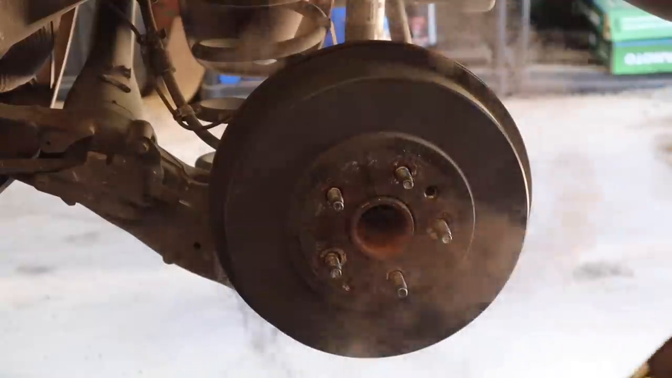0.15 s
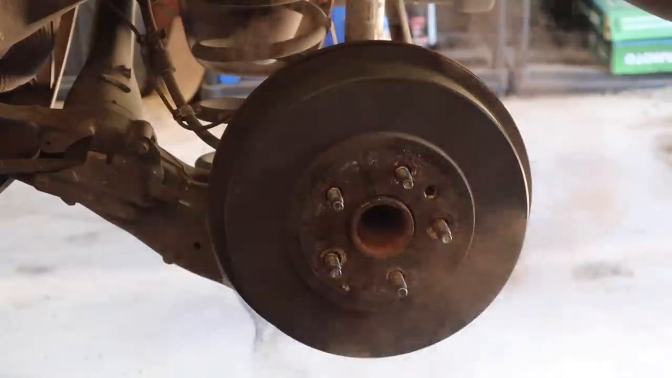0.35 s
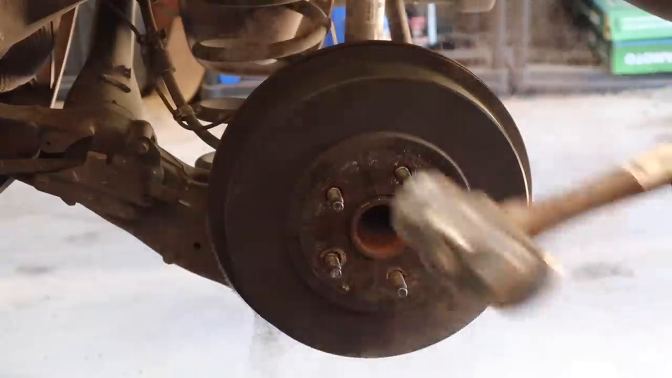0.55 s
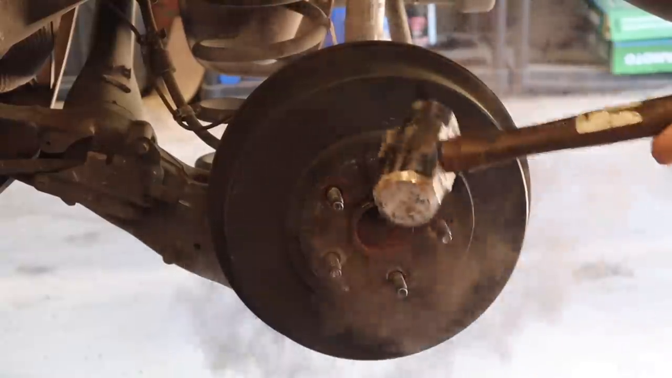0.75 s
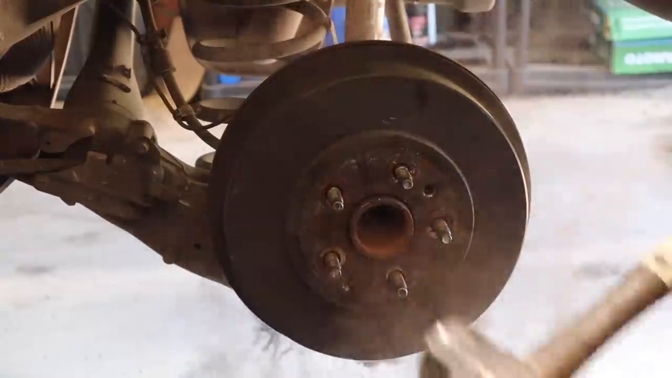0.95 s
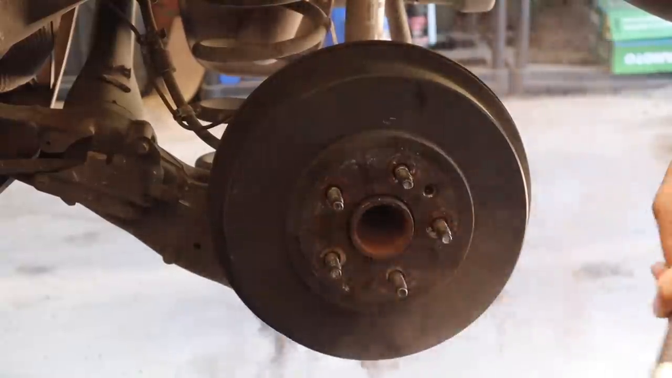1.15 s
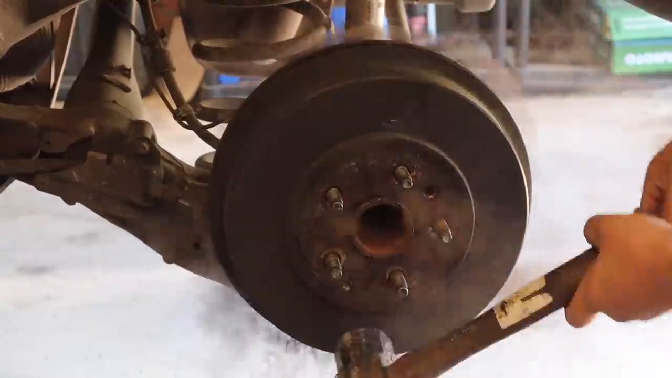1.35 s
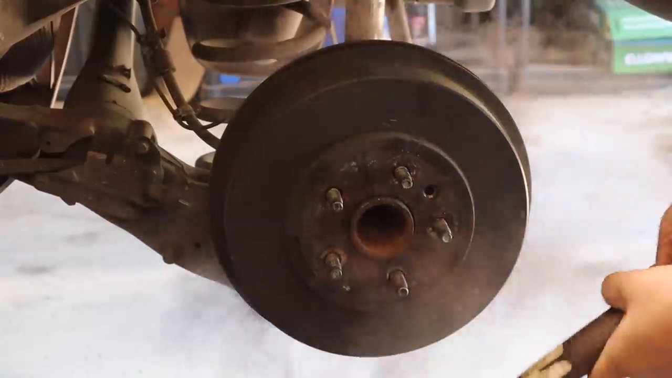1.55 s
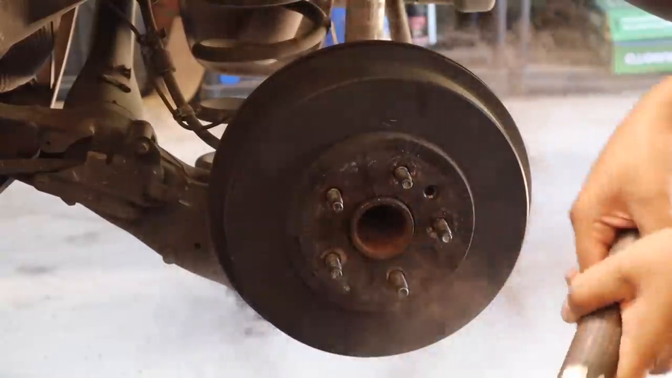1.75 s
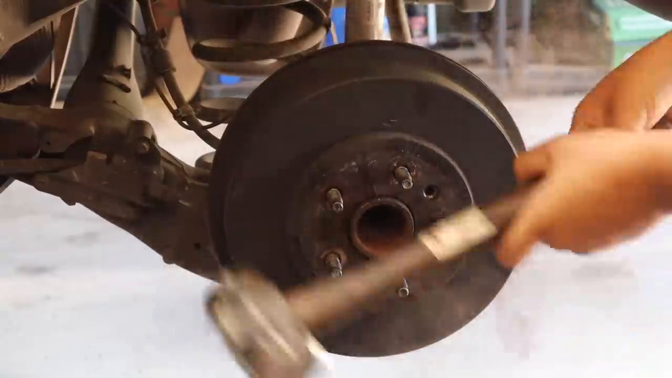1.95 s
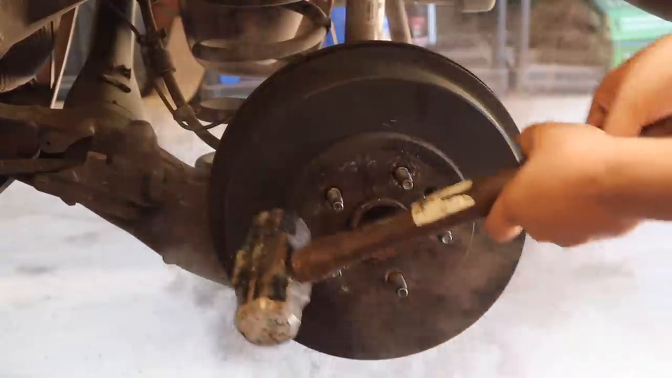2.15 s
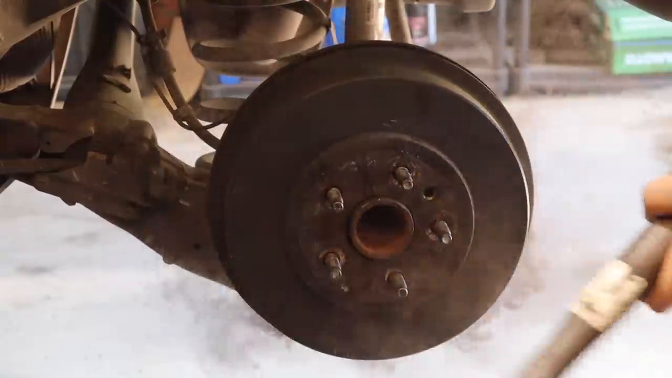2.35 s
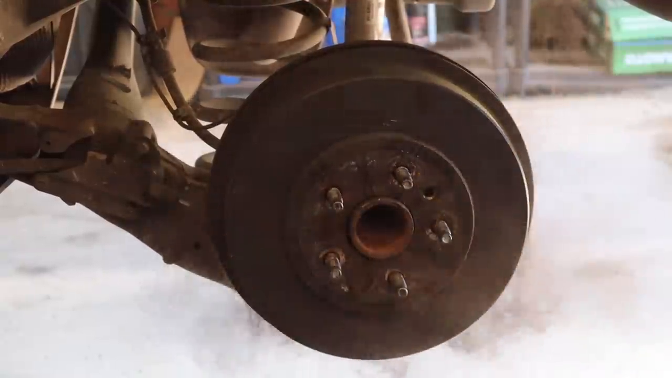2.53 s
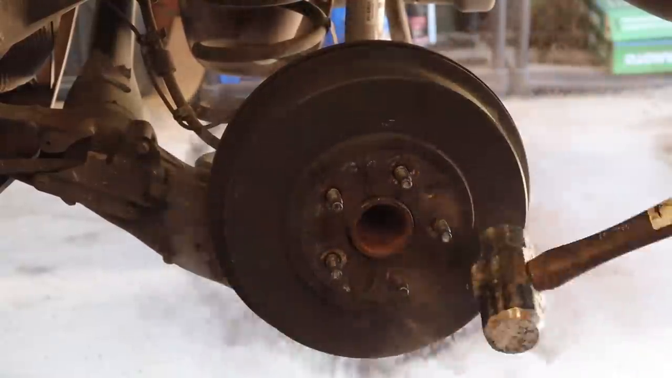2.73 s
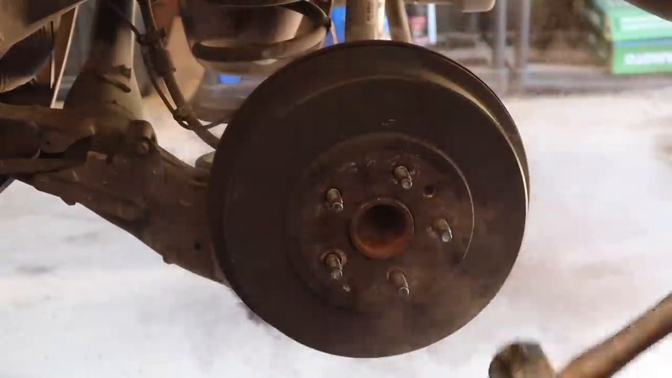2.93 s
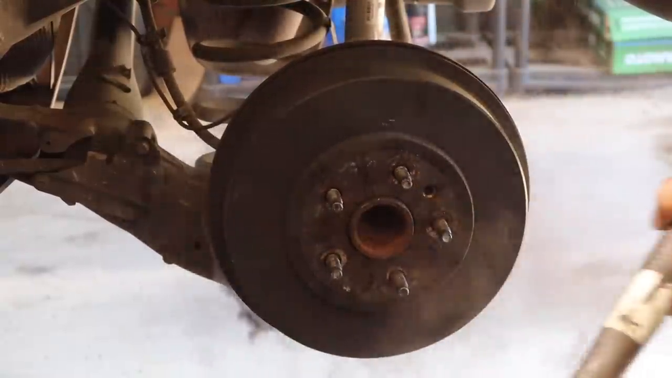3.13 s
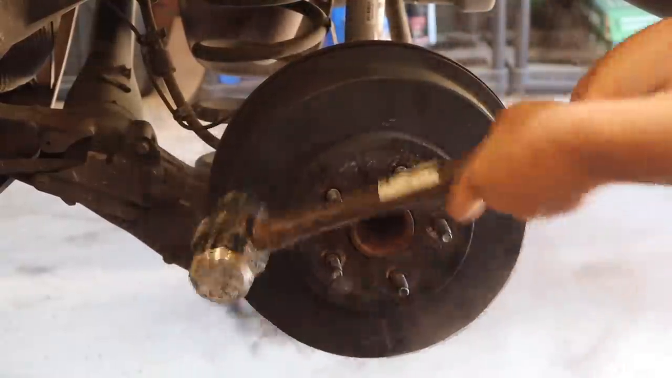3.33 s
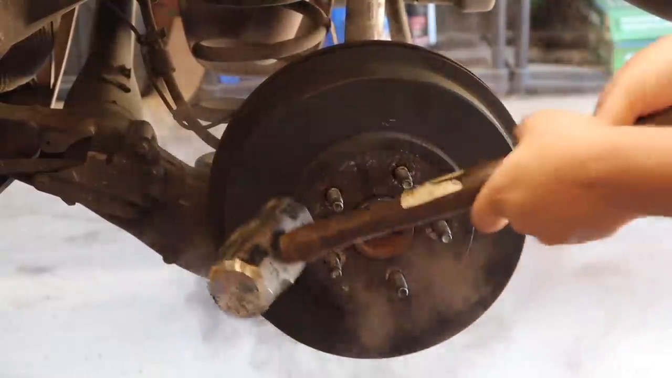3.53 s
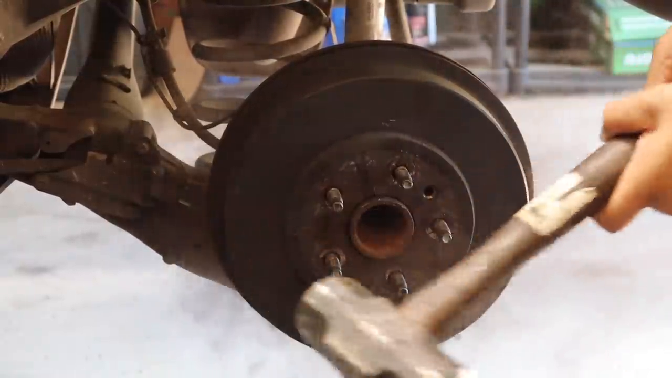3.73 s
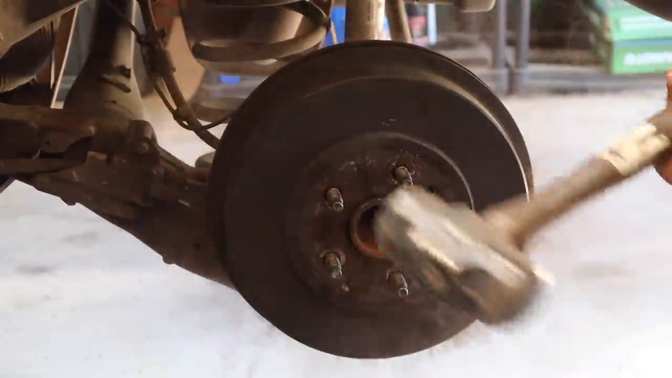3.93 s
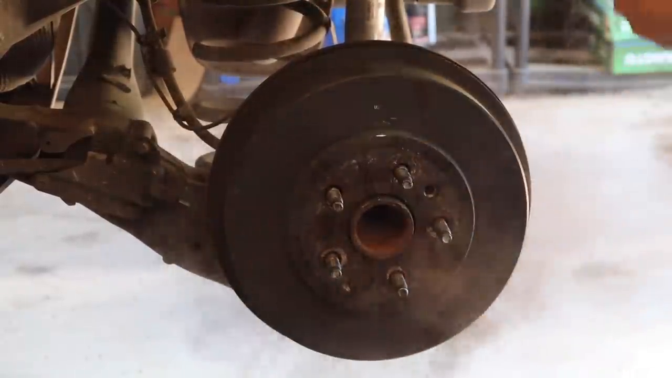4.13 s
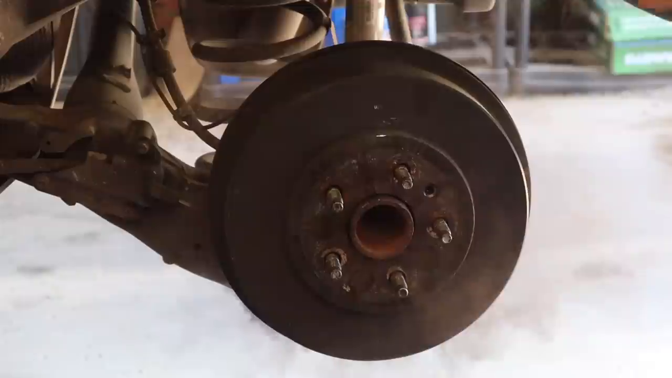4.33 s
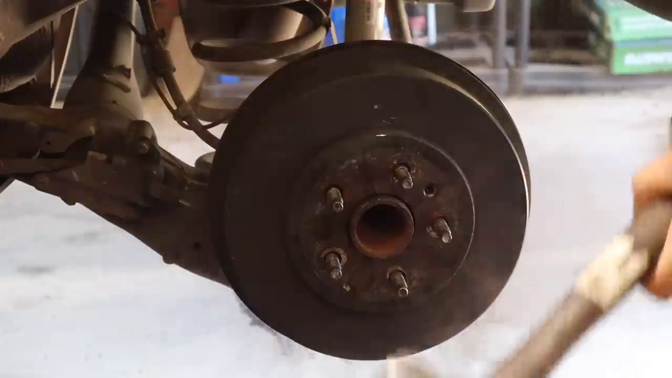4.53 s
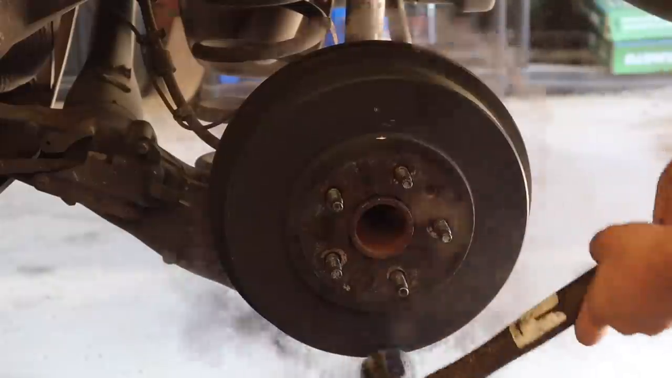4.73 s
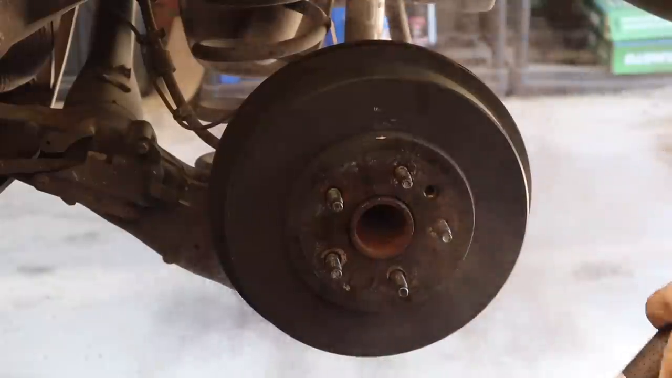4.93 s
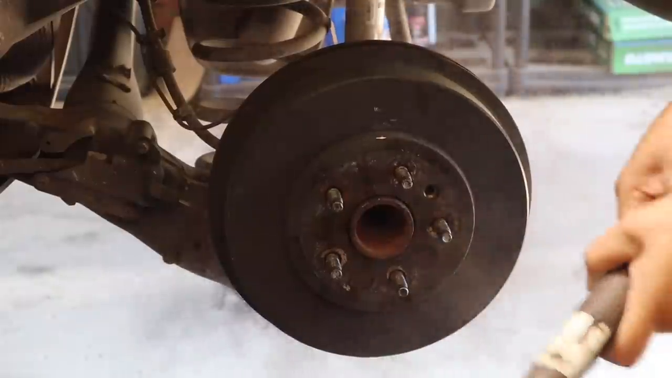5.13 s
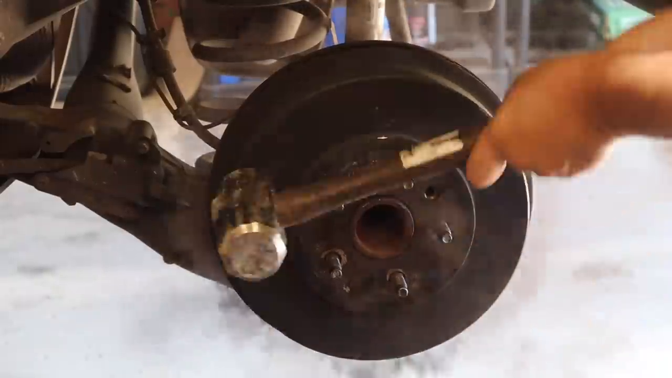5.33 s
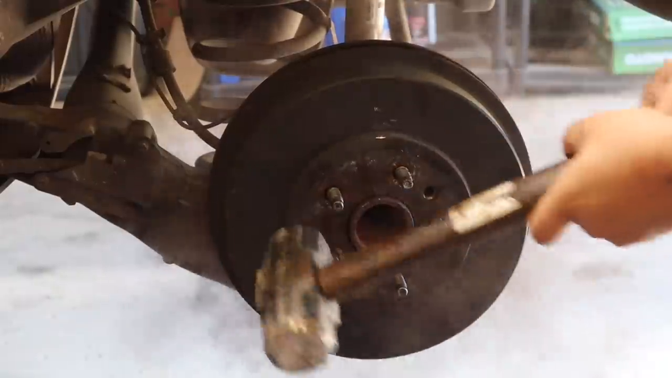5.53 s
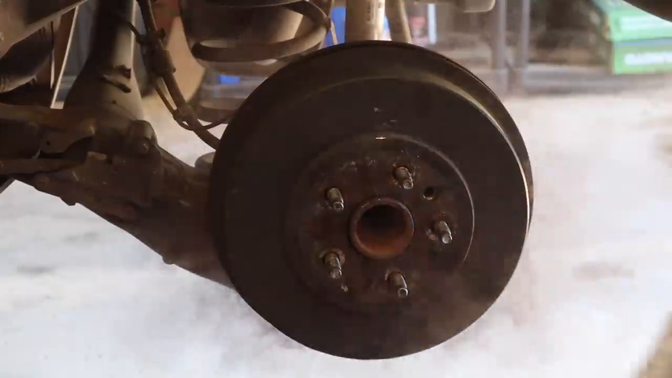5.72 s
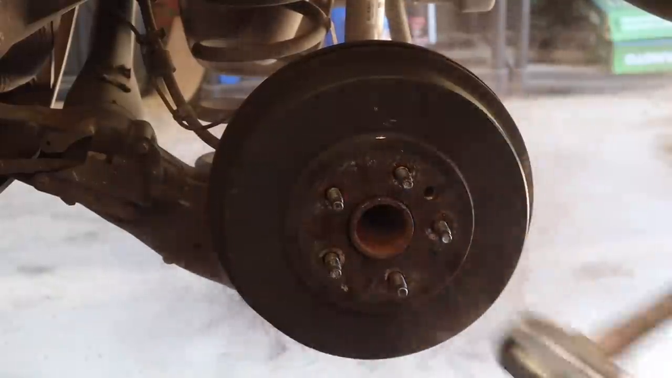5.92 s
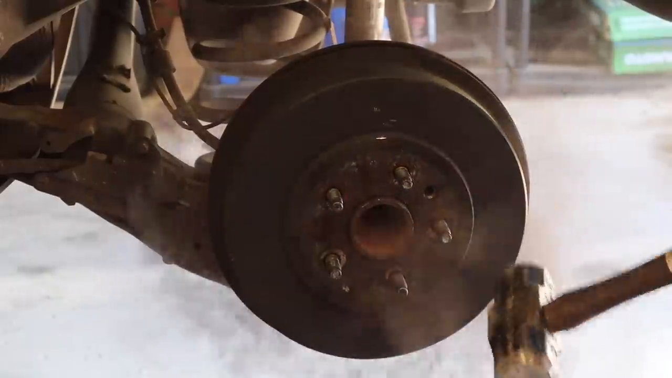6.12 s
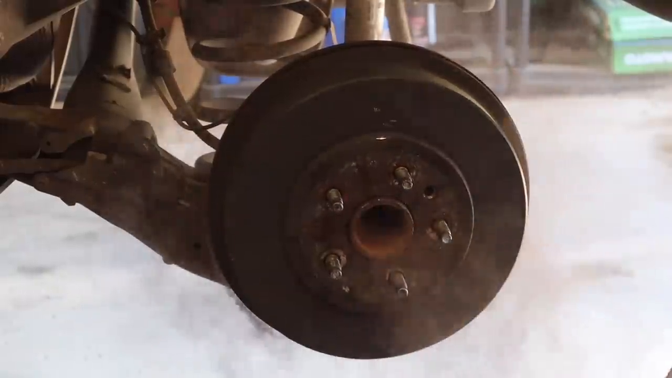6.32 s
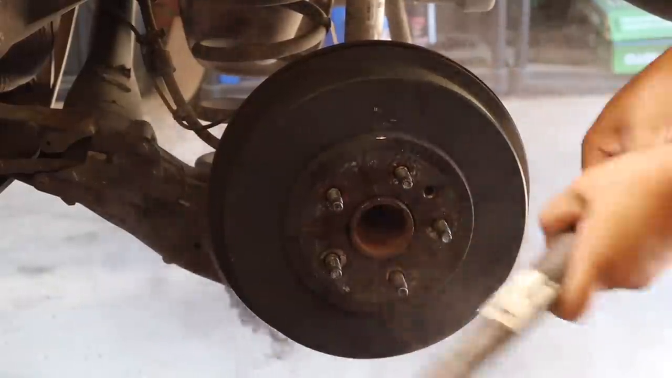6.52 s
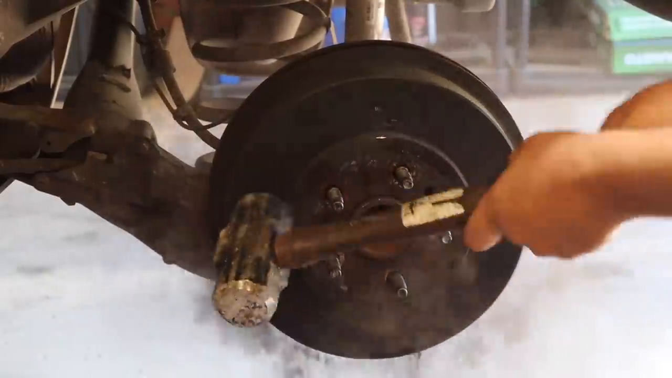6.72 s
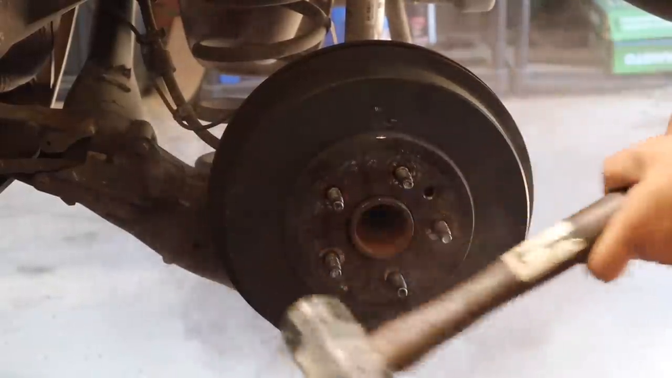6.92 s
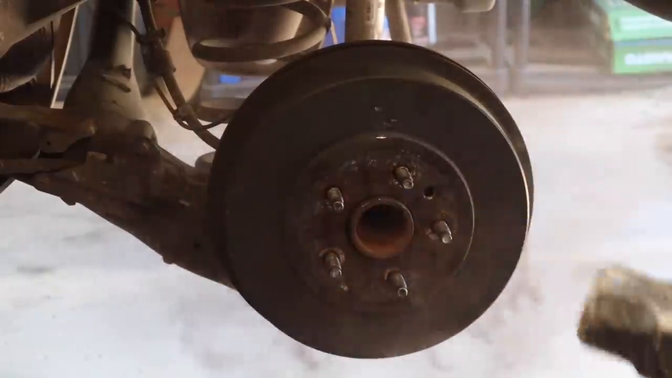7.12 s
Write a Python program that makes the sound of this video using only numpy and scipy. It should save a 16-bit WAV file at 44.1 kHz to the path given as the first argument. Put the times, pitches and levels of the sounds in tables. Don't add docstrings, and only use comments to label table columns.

```python
import sys
import numpy as np
from scipy import signal
from scipy.fft import rfft, irfft, next_fast_len
from scipy.io import wavfile
from scipy.ndimage import uniform_filter1d

SR = 44100
rng = np.random.default_rng(int(sys.argv[2]) if len(sys.argv) > 2 else 0)


def to_wav(sig):
    pcm = np.clip(np.atleast_2d(sig), -1, 1) * 32767
    pcm = np.round(pcm).astype(np.int16)
    wavfile.write(sys.argv[1], SR, pcm.T)


def gain_from_db(level_db):
    decades = np.asarray(level_db, float) / 20
    return 10 ** decades


N = 320607
TAIL = 65536
EARLY_S = 0.0011


def hammering():
    # t/s, force/dB, reach (0 hub - 1 rim), angle round the drum/degrees,
    # weight (0 skidding - 1 dead into the axle)
    blows = [(-0.006, -4, 0.26, 238.4, 0.94), (.7159, 0, 0.0088, 346, .7), (1.394, 2.3, .48, 241.4, .62),
             (2.092, 4, 0.44, 12.7, .33), (2.769, 0.7, .55, 295.9, .53), (3.4373, -1.1, .8, 291.4, .06),
             (4.1032, -6, 0.0087, 85.5, 0.012), (4.7726, 4.5, 0.087, 24.6, 0.65),
             (5.4125, 1.46, 0.91, 68, .35), (6.0713, 0.6, .25, 293.2, .21), (6.7087, 4, 0.37, 165.4, .01)]
    # level at the hub/dB, gain at the rim/dB,
    # swing from crest to mean/dB, angle of a crest/degrees
    rings = [(9, -11.5, 5.5, 94.4), (0.3, 0.5, 8.5, 82.3), (-7.5, 11.5, 8, 2.4), (-.3, -9, 12.5, 3.9),
             (-0.4, 4.5, -0.4, 22.5), (-0.94, 6.9, 5, 1.4)]
    # level at the hub/dB, gain at the rim/dB, gain by weight/dB,
    # gain by force/(dB per dB)
    parts = [
        (1.1, -5.5, -0.7, 0.3),
        (-8.5, -5.5, 9.5, 0),
        (3, -1.1, -1.9, 0.35),
        (-2, 6.5, -2.5, 0.78),
        (0.5, 0, -3.5, 0.98),
    ]
    out = np.zeros(N + 2 * TAIL)
    for s, force_db, reach, angle, weight in blows:
        colour = [hub + rim * reach + dead * weight + push * force_db for hub, rim, dead, push in parts]
        families = []
        for waves, (hub, rim, swing, crest) in enumerate(rings, 2):
            round_shell = swing * np.cos(np.radians(waves * (angle - crest)))
            families.append(force_db + hub + rim * reach + round_shell)
        i = TAIL + int((s - EARLY_S) * SR)
        out[i:i + TAIL] += blow(*colour, families)
    return out[TAIL:TAIL + N]


def blow(boom_db, thud_db, body_db, clang_db, bright_db, family_db):
    # f/Hz, level/dB per Hz
    crack_colour = [(40, -21), (100, -2), (200, 8.5), (500, 1), (1000, -2), (1700, -8), (2500, -8.5),
                    (4000, -6), (5500, -14.5), (8000, -16), (12000, -22.5), (17000, -35.5)]
    drum_hz = [2090, 2135, 2290, 2880, 2970, 3040, 3742, 3850, 3500, 4300, 4210, 4345, 5150, 5440, 5566,
               6170, 6060, 6130, 6865, 8260, 9360, 10300, 11250, 12400, 2200, 3350]
    # ring family (the last follows brightness), level/dB, t60/s
    drum = [(0, -4.5, 0.08), (0, -6, 0.035), (0, -13.5, 0.066), (1, -1.5, 0.061), (1, -7.5, 0.061),
            (4, -7.5, 0.074), (2, -5, 0.1), (4, -5, 0.045), (2, -22, 0.046), (3, -3, 0.075),
            (3, -7.5, 0.045), (3, -11, 0.064), (4, -7.5, 0.039), (4, -15, 0.1), (4, -14, 0.11),
            (5, -11, 0.1), (5, -0.5, 0.015), (5, -7, 0.056), (4, -20.5, 0.12), (6, -13.5, 0.079),
            (4, -25, .07), (3, -24, .04), (5, -26.5, .06), (4, -24, 0.041), (0, 0, 0.013), (1, -14, 0.035)]
    # f/Hz, level/dB, t60/s
    plate = [(1065, -49, 0.067), (1445, -2.5, 0.056), (1555, 0, 0.052), (1630, -2, 0.047), (1694, 2, 0.033),
             (1839, 6.5, 0.013)]
    # f/Hz, level/dB, t60/s
    axle = [(154, -12, 0.12), (184, -8, 0.05), (291, -13, 0.17), (344.2, -9.5, 0.15), (399, -14, .12),
            (475.3, -16, 0.3), (564, -19, 0.087), (659.5, -11, 0.068)]
    crack_db, ring_db, early_db = 33, -8.5, -42
    boom_hz, boom_level_db, boom_t60_s = 70, -13.5, 0.48
    bite_s = 0.0005

    place = [(60, boom_db), (170, thud_db), (600, body_db), (1600, clang_db),
             (3500, np.mean(family_db)), (10000, bright_db)]
    crack = gain_from_db(crack_db + shape(crack_colour) + shape(place)) ** 2

    answers_db = [*family_db, bright_db]
    table = [(hz, db + answers_db[k], t60) for hz, (k, db, t60) in zip(drum_hz, drum)]
    table += [(hz, db + clang_db, t60) for hz, db, t60 in plate]
    table += [(hz, db + body_db, t60) for hz, db, t60 in axle]
    chance = rng.standard_normal((len(table), 2))
    table = [(hz * (1 + .0015 * c[0]), db + 1.5 * c[1], t60) for (hz, db, t60), c in zip(table, chance)]
    impact = causal(crack + gain_from_db(ring_db) ** 2 * modes(table, TAIL))
    heard = irfft(impact * aftermath())

    t = np.arange(TAIL) / SR
    late = t - EARLY_S
    through_steel = gain_from_db(early_db) * np.gradient(heard) * (late < 0)
    through_air = np.roll(heard, int(EARLY_S * SR)) * np.clip(late / bite_s, 0, 1)
    boom_envelope = gain_from_db(boom_level_db + boom_db) * fade(boom_t60_s) * (1 - fade(0.035))
    boom = boom_envelope * np.sin(2 * np.pi * boom_hz * t)
    return (through_steel + through_air + boom) * np.clip(np.linspace(4, -1, TAIL), 0, 1)


def aftermath():
    # f/Hz, t60/s, build-up/s
    room = [(61, 0.93, 0.011), (222, 0.52, 0.06), (556, 0.69, 0.0029), (1200, 0.78, 0.0079),
            (3000, 0.71, 0.0017), (5800, 0.63, 0.0018), (8000, 0.48, 0.0021), (9700, 0.42, 0.0027),
            (13000, 0.4, 0.0024), (16000, 0.35, 0.0014)]
    room_db = 3
    chatter_db, chatter_t60_s = 15.5, 0.062
    snap_db, snap_t60_s = 4.5, 0.038
    noise, echoes = rfft(rng.standard_normal(TAIL)), 0
    for k, (_, t60, rise) in enumerate(room):
        share = shape([(row[0], float(j == k)) for j, row in enumerate(room)])
        build_up = 1 - np.exp(-np.arange(TAIL) / SR / rise)
        echoes = echoes + irfft(noise * share) * fade(t60) * build_up
    quick = gain_from_db(chatter_db) * unit(rng.standard_normal(TAIL) * fade(chatter_t60_s))
    quick += gain_from_db(snap_db) * unit(rng.standard_normal(TAIL) * fade(snap_t60_s))
    quick[0] += 1
    power = abs(rfft(quick)) ** 2
    even = causal(uniform_filter1d(power, size=1500) / uniform_filter1d(power, size=40))
    return gain_from_db(room_db) * rfft(unit(echoes)) + rfft(quick) * even


def modes(table, size):
    hz = np.arange(size // 2 + 1) * SR / size
    power = 0
    for mid, db, t60 in table:
        half_width = np.log(1000) / (2 * np.pi * t60)
        power = power + (gain_from_db(db) * SR / (4 * np.pi)) ** 2 / ((hz - mid) ** 2 + half_width ** 2)
    return power


def causal(power):
    fold = irfft(np.log(power) / 2)
    fold[1:TAIL // 2] *= 2
    fold[TAIL // 2 + 1:] = 0
    return np.exp(rfft(fold))


def shape(points):
    hz, value = np.transpose(points)
    return np.interp(np.log(np.arange(TAIL // 2 + 1) * SR / TAIL + 1), np.log(hz), value)


def fade(t60):
    return np.exp(-np.log(1000) * np.arange(TAIL) / SR / t60)


def unit(x):
    return x / np.sqrt(np.sum(x ** 2))


def puffs():
    # t/s, level/dB, f/Hz
    pushes = [
        (2.7445, -25, 269),
        (2.7525, -69, 250),
        (2.7615, -16.5, 78),
    ]
    t = np.arange(N) / SR
    out = 0
    for k, (s, db, hz) in enumerate(pushes):
        bell = np.exp(-(2.2 * hz * (t - s)) ** 2)
        out = out + gain_from_db(db) * (-1) ** k * np.cos(2 * np.pi * hz * (t - s)) * bell
    return out


def springs():
    # f/Hz, level/dB
    coils = [(4861, -74.5), (5270, -77), (5416, -70.5), (6288, -80.5), (6842, -75), (7267, -78.5),
             (7424, -83.5), (7542, -76.5), (7983, -80), (8974, -92), (9157, -87.5), (9846, -86.5),
             (10546, -88.5), (11057, -88), (11273, -72.5), (12382, -79), (13415, -83), (13808, -87),
             (14497, -78), (15698, -89.5)]
    spring_db, spring_t60_s, rustle_db = -28.5, 0.14, -70
    size = next_fast_len(N + SR, True) // 2 * 2
    knocks = trembling() * gain_from_db(1.5 * walk(25)) * rng.standard_normal(N)
    weak = [(5000 + 10000 * a, -85 + 8 * b) for a, b in rng.random(size=(30, 2))]
    table = [(hz, db + spring_db, spring_t60_s) for hz, db in list(coils) + weak]
    jingle = irfft(rfft(knocks, size) * np.sqrt(modes(table, size)))[:N]
    band = signal.butter(2, [5000, 14000], "band", fs=SR, output="sos")
    return jingle + gain_from_db(rustle_db) * signal.sosfilt(band, knocks)


def trembling():
    # start t/s, level/dB, length/s
    shakes = [
        (.001, 7, .3),
        (2.553, -13.5, .22),
        (2.819, 6, .63),
        (4.12, 11.5, .5),
        (4.595, 11, .2),
        (5.65, 2.5, .25),
        (5.891, 3, .2),
        (6.763, 7.5, .38),
    ]
    attack_s, sag_db_per_s, release_db_per_s, rest_db = 0.03, 15, 201.5, -23
    out = gain_from_db(rest_db)
    for s, db, length in shakes:
        late = np.clip(np.arange(N) / SR - s, 0, None)
        lost_db = sag_db_per_s * late + release_db_per_s * np.clip(late - length, 0, None)
        out = out + gain_from_db(db - lost_db) * (1 - np.exp(-late / attack_s))
    return out


def flakes():
    # t/s, level/dB
    landings = [
        (0.621, -60),
        (2.575, -62),
        (2.656, -60),
        (2.68, -62.5),
        (2.748, -53),
        (3.865, -64),
    ]
    out = np.zeros(N)
    for s, db in landings:
        tick = np.diff(rng.standard_normal(129)) * fade(.004)[:128]
        out[int(s * SR):int(s * SR) + len(tick)] += gain_from_db(db) * tick
    return out


def engines():
    # nearest t/s, level/dB, rise/s, fall/s, firing line on approach f/Hz
    cars = [
        (1.0, -49, .6, 0.33, 81.7),
        (3.3, -38, 1.3, 0.5, 80.2),
        (4.1, -43.5, 0.15, 0.33, 97),
        (5.4, -53, 0.9, 4.1, 91),
    ]
    doppler_drop, doppler_s, doppler_lead_s = 0.12, 0.39, 0.29
    upper_db, upper_lead = -6.5, 0.84
    wobble, flutter, upper_flutter = 1 + .008 * walk(9), gain_from_db(1.5 * walk(8)), gain_from_db(2.5 * walk(8))
    out = 0
    for s, db, rise, fall, hz in cars:
        gone = (1 + np.tanh((np.arange(N) / SR - s + doppler_lead_s) / doppler_s)) / 2
        turn = 2 * np.pi * np.cumsum(hz * (1 - doppler_drop * gone) * wobble) / SR
        firing = swell(s, db, rise, fall) * np.sin(turn)
        upper = swell(s - upper_lead * rise, db + upper_db, rise / 2, rise / 2) * upper_flutter
        out = out + flutter * (firing + upper * np.sin(turn * 3 / 2))
    return np.sqrt(2) * out


def fan():
    # loudest t/s, level/dB, rise/s, fall/s
    hum_swells = [
        (.01, -40.5, .3, 0.37),
        (1.1, -52, 0.8, 0.71),
        (3.651, -47.5, 0.49, 0.35),
        (4.6, -51.5, 0.33, 0.46),
        (6.4, -45.5, 0.63, 0.7),
    ]
    fan_hz, fan_db = 176.6, -72.5
    hum = gain_from_db(fan_db) + sum(swell(*row) for row in hum_swells)
    turn = 2 * np.pi * np.cumsum(fan_hz * (1 + .006 * walk(9))) / SR
    return np.sqrt(2) * hum * gain_from_db(2.5 * walk(7)) * np.sin(turn)


def street():
    # f/Hz, level/dB per Hz
    colour = [(30, -6.5), (70, 8), (150, 0), (300, 0.5), (600, -7.5), (1200, -9.5), (2500, -25.5),
              (5000, -47.5), (10000, -56.5), (16000, -68)]
    # loudest t/s, level/dB, rise/s, fall/s
    lorries = [
        (3.102, -55.5, 0.52, .6),
        (4.551, -46.5, 0.32, .2),
        (5.7, -47.5, 0.48, .35),
        (6.498, -43.5, .25, .25),
        (7.099, -52, 0.34, .6),
    ]
    rumble_db, drone_hz, drone_per_db = -46.5, 300, 1.2
    log_hz = np.log(np.arange(N // 2 + 1) * SR / N + 1)
    colour_hz, colour_db = np.transpose(colour)
    noise = rfft(rng.standard_normal(N)) * gain_from_db(np.interp(log_hz, np.log(colour_hz), colour_db))
    level = gain_from_db(rumble_db) + sum(swell(*row) for row in lorries)
    drone_db = drone_per_db * (20 * np.log10(level) - rumble_db)
    out = 0
    for mid in np.arange(3.5, 10, .5):
        band = irfft(noise * np.clip(1 - 2 * abs(log_hz - mid), 0, 1), N)
        lift_db = drone_db * np.exp(-(2 * (mid - np.log(drone_hz))) ** 2)
        out = out + gain_from_db(1.8 * walk(4.2) + lift_db) * band
    return level * out / np.std(out)


def swell(s, db, rise, fall):
    late = np.arange(N) / SR - s
    return gain_from_db(db) * np.exp(-(late / np.where(late < 0, rise, fall)) ** 2)


def walk(rate):
    k = int(SR / rate)
    held = np.repeat(rng.standard_normal(N // k + 1), k)
    return 1.3 * uniform_filter1d(uniform_filter1d(held, k), k)[:N]


def scene():
    near = hammering() + puffs() + springs() + flakes()
    far = engines() + fan() + street()
    return (near + far)[None]


def top_cut(x):
    return signal.sosfilt(signal.butter(12, 15750, fs=SR, output="sos"), x)


def record(dry):
    clip, knee = 0.83, 10
    mic_low_hz, mic_top_hz = 41.8, 15800
    clipped = clip * dry / (1 + abs(dry) ** knee) ** (1 / knee)
    sagged = signal.sosfilt(signal.butter(1, mic_low_hz, "high", fs=SR, output="sos"), clipped)
    cut = signal.sosfilt(signal.ellip(8, .1, 40, mic_top_hz, fs=SR, output="sos"), sagged)
    return top_cut(cut)


dry = scene()
out = record(dry)
to_wav(out)
```